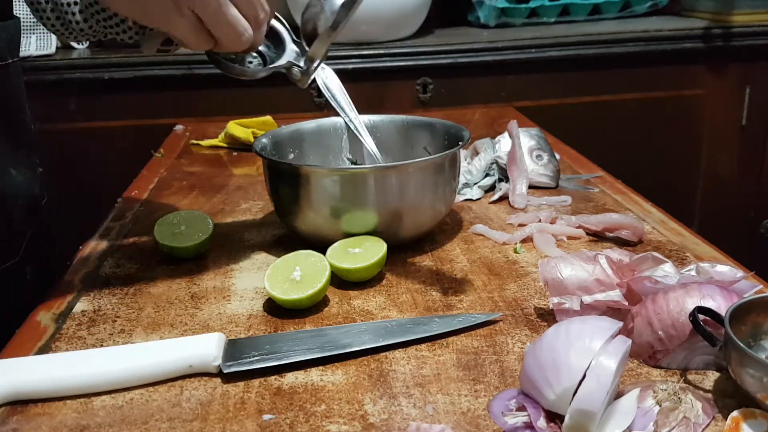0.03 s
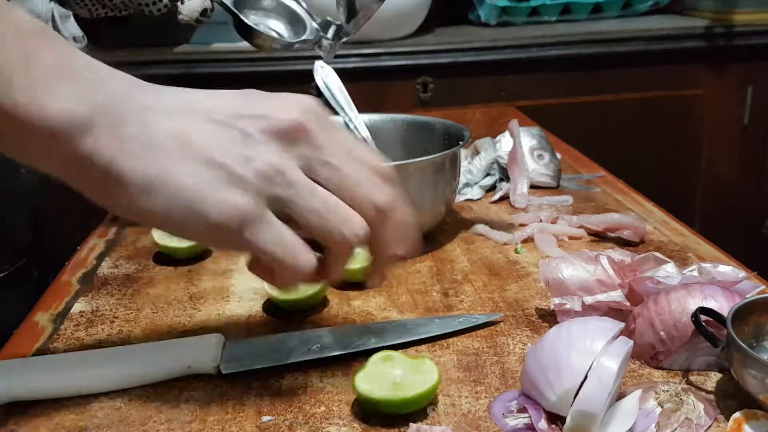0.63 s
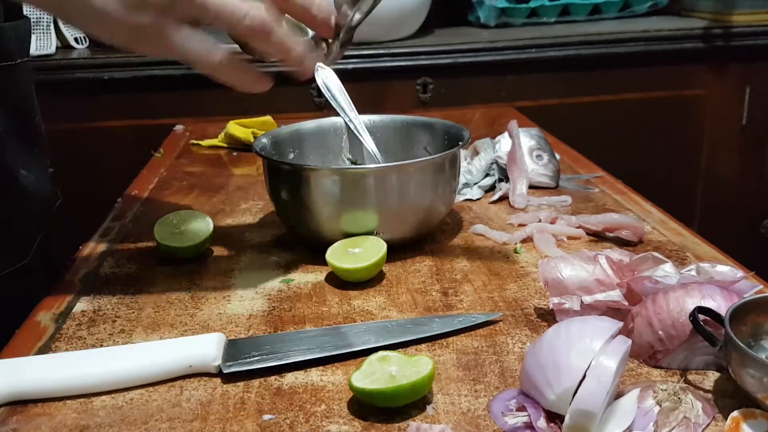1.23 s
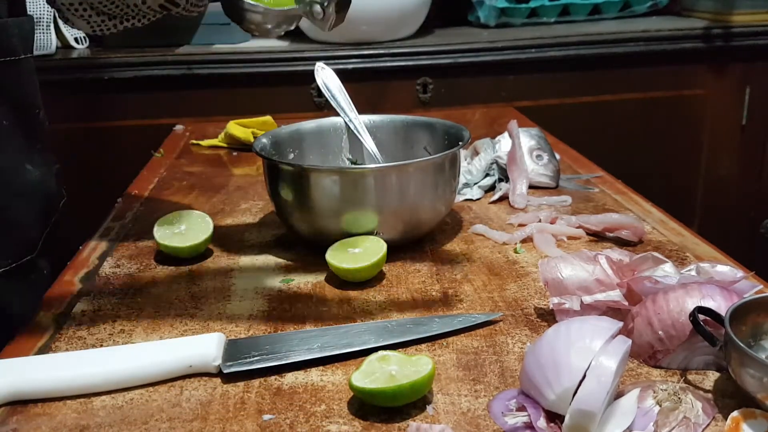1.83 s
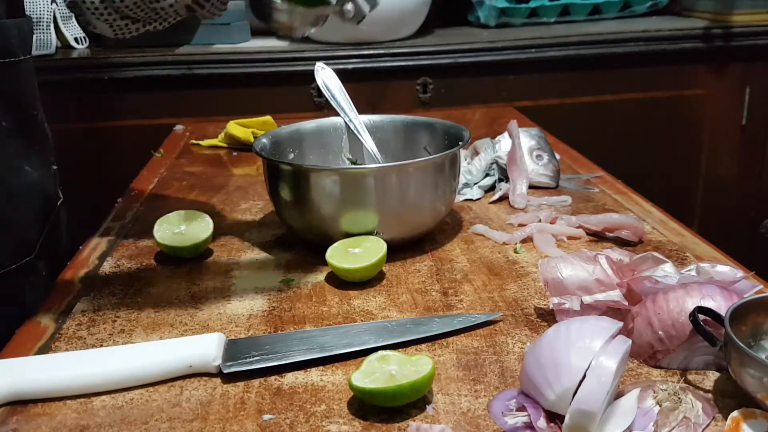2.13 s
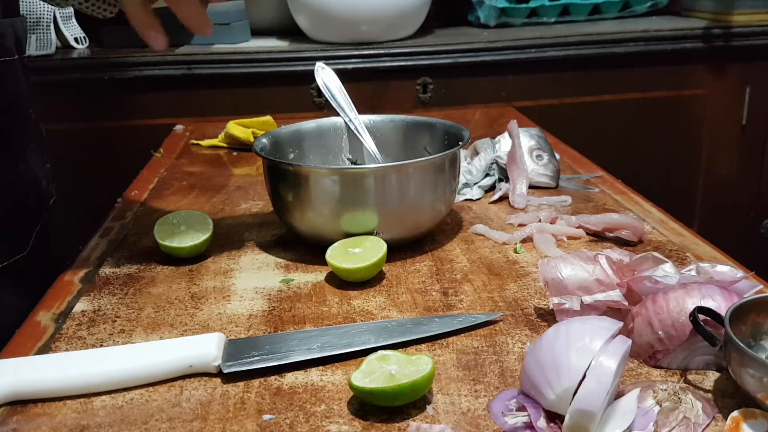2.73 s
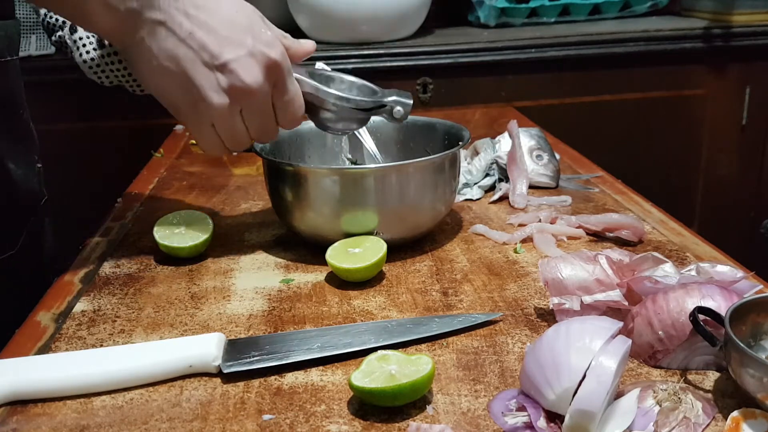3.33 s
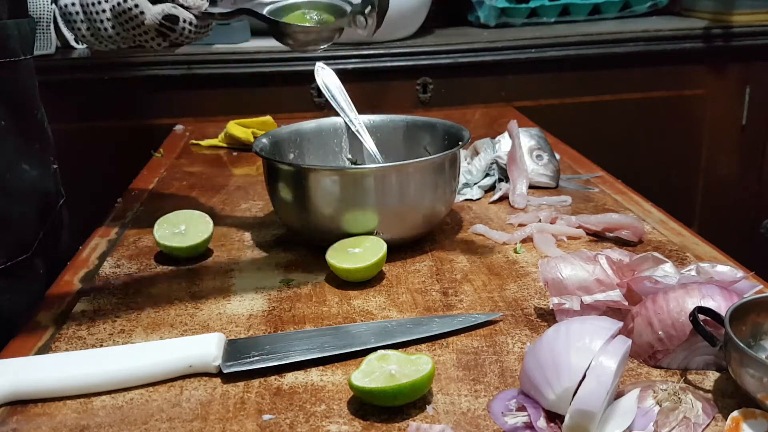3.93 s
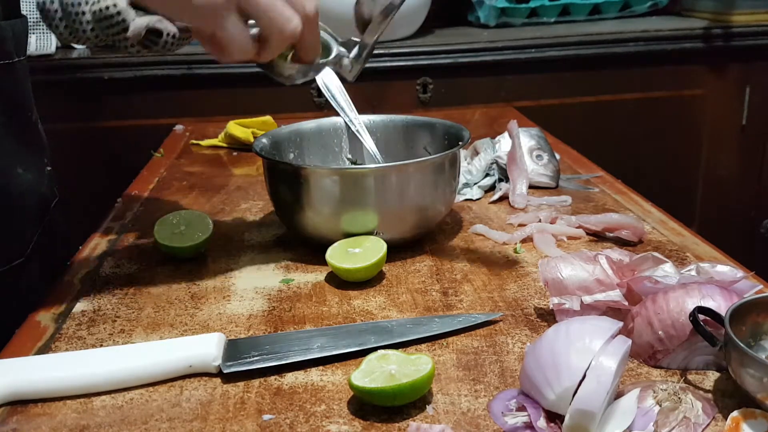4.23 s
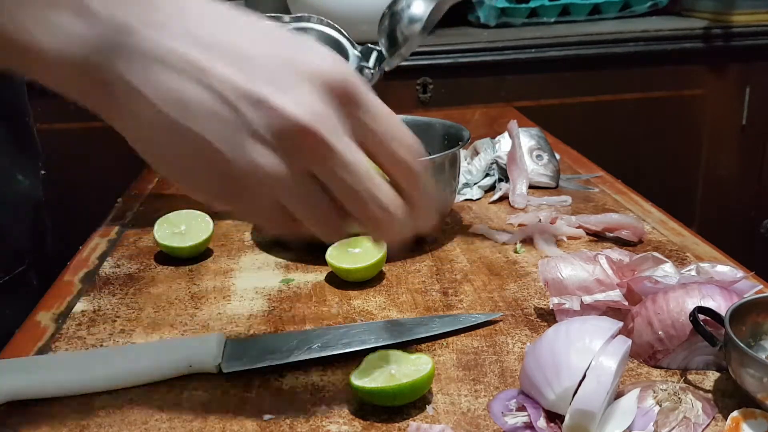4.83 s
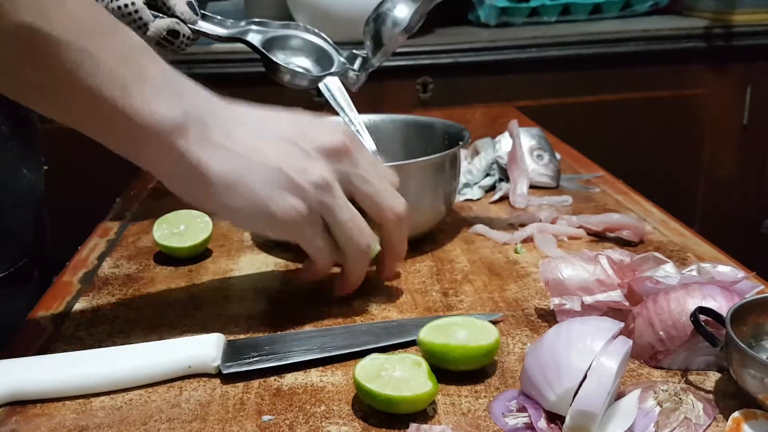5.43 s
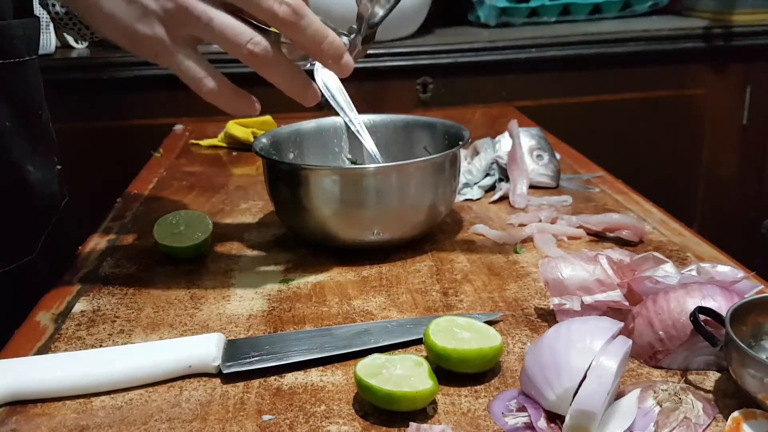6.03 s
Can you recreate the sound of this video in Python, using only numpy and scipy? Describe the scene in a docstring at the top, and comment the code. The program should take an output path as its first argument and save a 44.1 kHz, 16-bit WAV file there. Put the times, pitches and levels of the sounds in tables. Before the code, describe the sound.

A lime half lands on a wooden board close to the microphone with a dull thump and a wet slap. Further back and to the left, a metal hand press clacks shut, squeezes out juice in a faint sputtering hiss, then clinks open. Another half drops and rolls in a few soft bumps. A fridge hums quietly throughout in the small kitchen.

```python
"""A fridge hums in a small kitchen, and a hinged metal press rubs and ticks faintly as it is handled.
Up close a lime half drops on a wooden board: a dull thump from the wood, a wet slap from the flesh.
Further back the press clacks shut, bursts juice cells into a hiss over a deep flutter, and clinks open.
Another half lands and rolls in a few bumps. The room answers each knock and squirt with a short tail."""
import sys
import numpy as np
from scipy import signal
from scipy.fft import rfft, irfft, next_fast_len
from scipy.io import wavfile
from scipy.ndimage import map_coordinates

SR = 44100
rng = np.random.default_rng(int(sys.argv[2]) if len(sys.argv) > 2 else 0)


def generate_wav(signal):
    """Clip the signal to [-1, 1] and save it as 16-bit WAV at the path in sys.argv[1]."""
    frames = np.transpose(np.atleast_2d(signal))
    scaled = np.clip(frames, -1, 1) * 32767
    pcm = np.round(scaled).astype(np.int16)
    wavfile.write(sys.argv[1], SR, pcm)


N = 269010
TIME = np.arange(N) / SR
RING = np.arange(int(.7 * SR)) / SR  # seconds since a hit


def undb(db):
    """Decibels to gain."""
    return 10 ** (np.asarray(db) / 20)


def unit(x):
    """Scale to rms 1."""
    return x / np.sqrt(np.mean(x ** 2))


def unit_hit(x):
    """Scale to the energy of 10 ms at rms 1."""
    return x / np.sqrt(np.sum(x ** 2) / (SR / 100))


def along(points, hz):
    """Read a curve on a log-frequency axis."""
    f, value = np.transpose(points)
    return np.interp(np.log(np.maximum(hz, 1)), np.log(f), value)


def eq(x, curve):
    """Shape a signal with a curve of (f/Hz, level/dB) points."""
    n = x.shape[-1]
    size = next_fast_len(n)
    gain = undb(along(curve, np.fft.rfftfreq(size, 1 / SR)))
    return irfft(rfft(x, size) * gain, size)[..., :n]


def butter(x, hz, kind, order=2):
    """Causal low-, high- or band-pass."""
    sos = signal.butter(order, np.clip(hz, 5, .48 * SR), kind, fs=SR, output="sos")
    return signal.sosfilt(sos, x)


def wander(rate_hz):
    """Smooth random modulation with a spread near 1."""
    knots = rng.standard_normal(1024)
    return 1.2 * map_coordinates(knots, [TIME * rate_hz], order=3, mode="wrap")


def swell(peak_s, db, rise_s, fall_s):
    """Envelope that grows to a peak and dies away, by 20 dB in each rise or fall time."""
    return undb(db - 20 * np.maximum((peak_s - TIME) / rise_s, (TIME - peak_s) / fall_s))


def grains(per_s, spread_db, hiss_db):
    """Tiny bursts of very unequal size over a smooth hiss."""
    bursts = (rng.random(N) < per_s / SR) * rng.standard_normal(N)
    sizes = undb(spread_db * np.minimum(rng.exponential(size=N), 4))
    return unit(bursts * sizes) + undb(hiss_db) * rng.standard_normal(N)


def pan(x, db):
    """Place a sound, left minus right in dB."""
    return x * undb(np.array([[db], [-db]]) / 2)


def add(track, s, sound):
    """Mix a sound in at time s."""
    i = int(s * SR)
    track[..., i:i + sound.shape[-1]] += sound[..., :N - i]


# stereo width of diffuse sound [f/Hz, side minus mid/dB]
STEREO_WIDTH = [(60, -16.5), (250, -10), (500, -1.5), (1000, -2), (2500, 1), (16000, 1.5)]


def diffuse(n):
    """Stereo noise from all directions: narrow in the bass, wide in the treble."""
    mid, side = rng.standard_normal((2, n))
    side = eq(side, STEREO_WIDTH)
    return np.array([mid + side, mid - side])


# motor hum [multiple of the shaft rate, level/dB]
MOTOR_HARMONICS = [(2, -63), (3, -60.5), (4, -64.5), (5, -67), (6, -61), (7, -73), (8, -73), (10, -71),
                   (13, -77)]
# motor whine and faint steady high tones [f/Hz, level/dB]
WHINE_TONES = [(604, -72), (694, -74), (2778, -82), (4134, -86)]
# tone of the moving air [f/Hz, relative level/dB]
AIR_EQ = [(20, -10), (60, -8), (90, -7), (130, 2.5), (190, 0.5), (300, -3.5), (450, -11), (720, -11),
          (950, -19), (1800, -26), (3000, -28.5), (6000, -38.5), (10000, -42), (15000, -38.5)]


def fridge(shaft_hz=59.2, drift=0.0021, waver_db=2):
    """The bed: wavering motor harmonics and a thin whine over soft moving air."""
    turns = np.cumsum(shaft_hz * (1 + drift * wander(3))) / SR
    tones = [(k * turns, db) for k, db in MOTOR_HARMONICS] + [(hz * TIME, db) for hz, db in WHINE_TONES]
    hum = 0
    for cycles, db in tones:
        amplitude = np.sqrt(2) * undb(db + waver_db * wander(5))
        phase = 2 * np.pi * (cycles + rng.random()) + 0.66 * wander(8.1)
        hum += amplitude * np.sin(phase)
    air = unit(eq(diffuse(N), AIR_EQ)) * undb(-54 + 0.067 * wander(1.5))
    return pan(hum + air, -0.044)


def rumble(rest_db=-81.5, work_db=-66, start_s=2.9, end_s=4.8, fade_s=.3):
    """A sub-bass flutter, faint at rest and stronger while the press is worked."""
    working = np.clip(1 + np.minimum(TIME - start_s, end_s - TIME) / fade_s, 0, 1)
    flutter = unit(butter(rng.standard_normal(N), [14, 29], "band"))
    return flutter * undb(rest_db + working * (work_db - rest_db))


# grips on the press [peak t/s, relative level/dB, swell and fade per 20 dB/s (sign has no effect)]
GRIPS = [(0.25, -62, 1.5), (3.07, -60, 0.65), (3.24, -57, 0.54), (3.66, -67, -1.2), (3.93, -56, 0.17),
         (4.07, -56.5, 0.1), (4.29, -55, 0.24)]
# tone of the friction [f/Hz, relative level/dB]
RUB_EQ = [(300, 15), (900, 10), (1700, 3.5), (3200, 1), (5500, -5), (8000, -8.5), (16000, -46)]


def rind_rub():
    """Rind and fingers rub in the cup: a grainy friction that swells with each grip."""
    grip = sum(swell(s, db, fade_s, fade_s) for s, db, fade_s in GRIPS)
    friction = unit(eq(grains(per_s=2000, spread_db=1.8, hiss_db=0), RUB_EQ))
    return friction * grip * undb(2 * wander(35))


# reverb time of the kitchen [f/Hz, t60/s]
KITCHEN_DECAY = [(125, 0.49), (500, 0.35), (1500, 0.33), (4000, 0.32), (9000, 0.24), (16000, 0.15)]


def kitchen(x, build_s, low_cut_hz):
    """Diffuse room tail: it builds up quickly and the treble dies first."""
    spectrum, hz = rfft(diffuse(len(RING))), np.fft.rfftfreq(len(RING), 1 / SR)
    octave = np.clip(np.log2(np.maximum(hz, 1) / 125), 0, 7)
    tail = 0
    for k in range(8):
        band = irfft(spectrum * np.maximum(1 - abs(octave - k), 0), len(RING))
        tail += band * undb(-60 * RING / along(KITCHEN_DECAY, 125 * 2 ** k))
    tail *= 1 - np.exp(-RING / build_s)
    tail = butter(tail / np.sqrt(np.sum(tail ** 2) / 2), low_cut_hz, "high", order=1)
    return signal.fftconvolve(np.atleast_2d(x), tail, axes=1)[:, :N]


# ring of the cup and handles [f/Hz, relative level/dB, t60/s]
PRESS_MODES = [(1640, 6, .2), (2025, 0, 0.2), (3080, -4.5, .2), (3685, -15, 0.16), (4134, -14, 1.3),
               (5300, -8, .15), (6196, -4, 0.43), (7300, -5, 0.34), (7700, -6, 0.17), (8440, -4, 0.13),
               (9200, -18, 0.088), (10470, -1, 0.11), (12300, 2, 0.11), (13600, 1, .11)]
# steel-on-steel hits [t/s, relative level/dB, contact f/Hz, scrape decay/s, ring over scrape/dB]
PRESS_HITS = [(0.072, -57.5, 2930, .004, -4), (0.475, -59.5, 13000, .0027, -21),
              (1.339, -48.5, 1400, 0.0025, -21), (1.344, -56.5, 7600, .003, 8),
              (2.2495, -40.5, 3000, 0.0068, -19.5), (2.2732, -38.5, 1340, 0.0078, -24),
              (2.2773, -30.5, 10400, 0.002, -19), (2.277, -33, 3030, 0.007, -11),
              (3.2556, -41, 4950, 0.0021, -23), (3.3254, -38.5, 11600, 0.00032, -18),
              (3.3253, -35.5, 3300, 0.00099, -24), (3.407, -53.5, 8600, 0.0046, -7),
              (3.562, -59.5, 3820, 0.0013, -7), (3.616, -56.5, 7700, 0.0081, -15),
              (3.876, -51, 8700, .0005, -27), (3.877, -49, 4520, .0006, -31),
              (3.929, -53.5, 3250, .002, -23), (4.145, -47.5, 9200, 0.0043, -6),
              (4.147, -45, 2150, 0.0017, -12), (4.266, -51, 2440, 0.0018, -5), (4.517, -63, 9900, .0044, 6),
              (4.52, -55.5, 1650, .003, -14), (5.910, -54.5, 7350, .003, 10),
              (5.939, -50.5, 1990, 0.0014, -15)]


def press_clinks(closed_s=(2.2, 3.9), grip_db_per_s=220, scatter_db=1.5):
    """Steel parts scrape for a moment and ring; where they touch decides which pitch stands out."""
    clinks = np.zeros(N)
    hz, db, t60 = np.transpose(PRESS_MODES)[:, :, None]
    modes = undb(db - 60 * RING / t60) * np.sin(2 * np.pi * hz * RING)
    for s, level_db, contact_hz, scrape_s, ring_db in PRESS_HITS:
        burst = rng.standard_normal(len(RING)) * np.exp(-RING / scrape_s)
        scrape = butter(burst, [650, 14000], "band", order=1)
        # the modes near the contact pitch take most of the force, a little differently each time
        share = .25 + np.exp(-2 * np.log2(hz[:, 0] / contact_hz) ** 2)
        share *= undb(scatter_db * rng.standard_normal(len(modes)))
        ring = (share * rng.choice([-1, 1], len(modes))) @ modes
        if closed_s[0] < s < closed_s[1]:  # the fist round the closed handles damps them
            ring *= undb(-grip_db_per_s * RING)
        clink = unit_hit(scrape) + undb(ring_db) * unit_hit(ring)
        # a light touch brings out one pitch; a hard blow wakes the whole press
        boost_db = 16 - 0.44 * (level_db + 47.5)
        width = 0.28 * undb(-boost_db / 2)  # a taller resonance is narrower
        band = butter(clink, contact_hz * np.exp([-width, width]), "band", order=1)
        add(clinks, s, undb(level_db - 9.5) * unit_hit(clink + (undb(boost_db) - 1) * band))
    reverb = kitchen(clinks, build_s=0.0009, low_cut_hz=360)
    return pan(clinks, 9.8) + undb(2) * pan(reverb, 2.3)


# ring of the board and the table under it [f/Hz, relative level/dB, t60/s]
BOARD_MODES = [(128.7, -2, 0.5), (172, -7.5, 0.28), (238.6, -4.5, 0.21), (249, -3, 0.31), (304, 0, 0.2),
               (334.8, -5.5, 0.17), (358.3, -10, 0.33), (378.4, -7.5, 0.39), (469, -9, .3),
               (494.5, -3, 0.13), (583, -11, 0.21), (652, -15, 0.25), (764, -18, 0.25), (841, -4, 0.084),
               (929, -14.5, 0.13), (1062, -17, 0.094), (1098, -16, 0.14), (1270, -16, 0.15),
               (1510, -16, 0.077)]


def board_thump(soft_hz, weight_db, give_hz=316, give_s=0.0017, ring_db=-12):
    """The board gives under the fruit in one heavily damped shove, then rings on briefly."""
    thump = -RING / give_s * np.exp(1 - RING / give_s) * np.cos(2 * np.pi * give_hz * RING)
    attack = 1 - np.exp(-RING / 0.001)  # bending waves take a moment to fill the table
    hz, db, t60 = np.transpose(BOARD_MODES)[:, :, None]
    modes = undb(db - 60 * RING / t60) * np.sin(2 * np.pi * hz * RING) * attack
    lowness = 1 / (1 + (hz[:, 0] / 205) ** 8)
    ring = undb(ring_db + weight_db * lowness) @ modes
    return butter(thump + ring, soft_hz, "low", order=1)


# tone of wet flesh on wood [f/Hz, relative level/dB]
SLAP_EQ = [(80, -58), (250, 5), (720, 14.5), (1300, 5.5), (2200, -1), (3400, -11), (4800, -17),
           (8000, -19.5), (16000, -28)]


def flesh_slap(level_db, soft_hz, squish_db=-10, squish_s=0.022):
    """The first wet contact is a bright slap; the flesh then settles in a duller squish."""
    slap_s = 0.011 * 2 ** (level_db / 28.5)  # a harder landing spreads the flesh for longer
    wet_db = -14 + 6 * np.log2(soft_hz / 2350)  # the cut face lands brighter and wetter than the rind
    splash = unit(eq(diffuse(len(RING)), SLAP_EQ))
    slap = butter(splash, 3 * soft_hz, "low", order=1) * np.exp(-RING / slap_s)
    squish = butter(splash, soft_hz, "low", order=1) * np.exp(-RING / squish_s)
    return undb(level_db + wet_db) * (slap + undb(squish_db) * squish)


# drops, rolls and nudges [t/s, relative level/dB, treble corner f/Hz, weight on the lowest modes/dB]
LIME_HITS = [(0.5266, -7, 2570, -14), (0.8727, -35.5, 4770, -10), (3.918, -33, 191, 2.5),
             (5.0552, -6.5, 2360, -1), (5.193, -26, 1720, 6.5), (5.266, -28.5, 1280, 5),
             (5.307, -40, 3000, 0), (5.404, -35.5, 2560, 12), (5.433, -35.5, 1090, -3),
             (5.452, -37, 2000, 1), (5.666, -42, 900, 13)]


def limes():
    """Lime halves land and roll close by, each bump a wooden thump layered with a wet slap."""
    wood, wet = np.zeros(N), np.zeros((2, N))
    for s, db, soft_hz, weight_db in LIME_HITS:
        add(wood, s, undb(db) * board_thump(soft_hz, weight_db))
        add(wet, s, flesh_slap(db, soft_hz))
    wood = butter(wood, 112, "high", order=6)  # below 112 Hz the knock falls away steeply
    direct = pan(wood, 0.78) + pan(wet, 5.1)
    bounced = pan(wood, 1.0) + butter(pan(wet, 1.2), 1800, "low", order=1)
    reverb = kitchen(wood, build_s=0.0031, low_cut_hz=320) + kitchen(wet, build_s=0.00071, low_cut_hz=230)
    return direct + early_reflections(bounced) + undb(-4) * reverb


# bounces off the cupboard and wall [delay/s, gain, left lead and right lag/s]
REFLECTIONS = [(.0114, .55, .0001), (.0172, .3, -.0001)]


def early_reflections(stereo):
    """Nearby surfaces throw the sound back, reaching one ear just before the other."""
    echoes = np.zeros((2, N))
    for delay_s, gain, lag_s in REFLECTIONS:
        for ear, side in enumerate((-1, 1)):
            echoes[ear] += gain * np.interp(TIME - delay_s - side * lag_s, TIME, stereo[ear])
    return echoes


# squirts as the fist tightens [peak t/s, relative level/dB, build-up per 20 dB/s]
JUICE_SQUIRTS = [(3.055, -55, 0.13), (3.15, -60, 0.08), (3.205, -51, 0.07), (3.255, -53.5, .06),
                 (3.64, -65.5, .15), (4.06, -66.5, .2)]
# tone of the spray [f/Hz, relative level/dB]
SPRAY_EQ = [(1500, -30), (3000, 5), (5000, -2), (7000, -2), (9500, 6.5), (12000, 8.5), (16000, 5)]


def juice_spray(release_s=0.059):
    """Juice cells burst and spray through the holes in a bright, sputtering hiss."""
    flow = sum(swell(s, db, rise_s, release_s) for s, db, rise_s in JUICE_SQUIRTS)
    fizz = unit(eq(grains(per_s=1500, spread_db=2.8, hiss_db=1), SPRAY_EQ))
    return fizz * flow * undb(3.2 * wander(50))


def squeeze():
    """Spray and rub both come from the cup of the press, back and to the left."""
    cup = juice_spray() + rind_rub()
    reverb = kitchen(cup, build_s=0.0012, low_cut_hz=390)
    return undb(-9.5) * pan(cup, 10) + undb(-6.5) * pan(reverb, 1.5)


def scene():
    """The board in front, the press behind it, the fridge all round."""
    return limes() + press_clinks() + squeeze() + fridge() + rumble()


def record(dry):
    """A steep high cut at 15.9 kHz on the whole mix."""
    return signal.sosfilt(signal.ellip(10, .2, 70, 15900, fs=SR, output="sos"), dry)


dry = scene()
out = record(dry)
generate_wav(out)
```